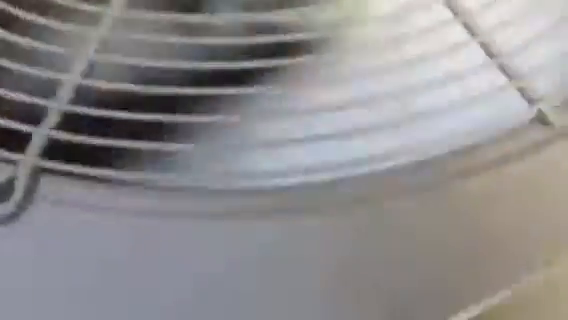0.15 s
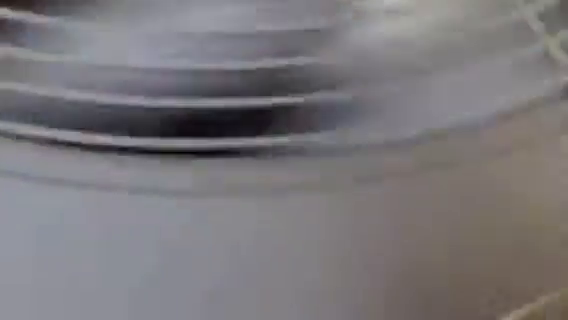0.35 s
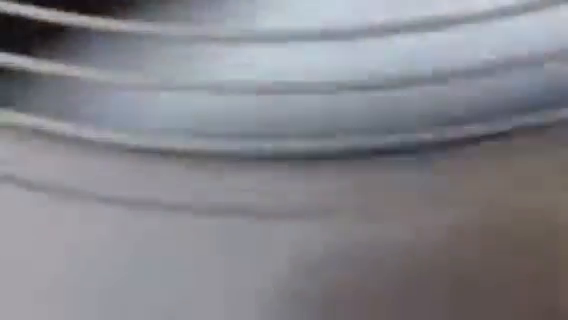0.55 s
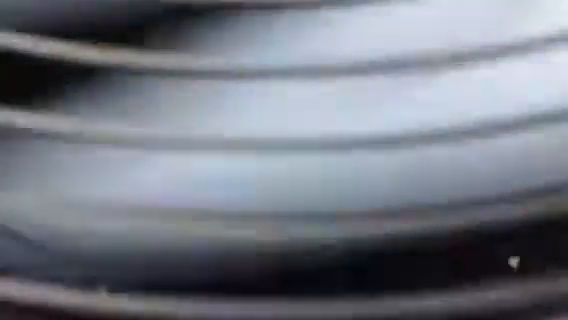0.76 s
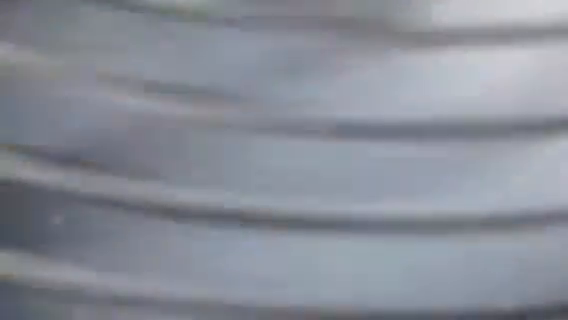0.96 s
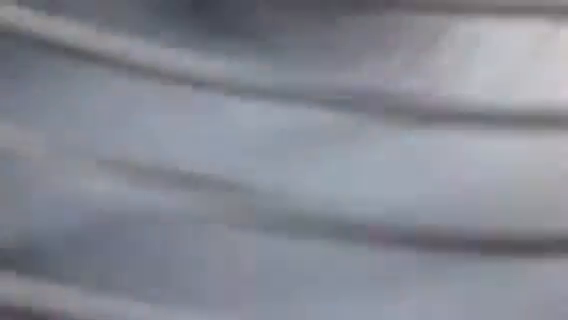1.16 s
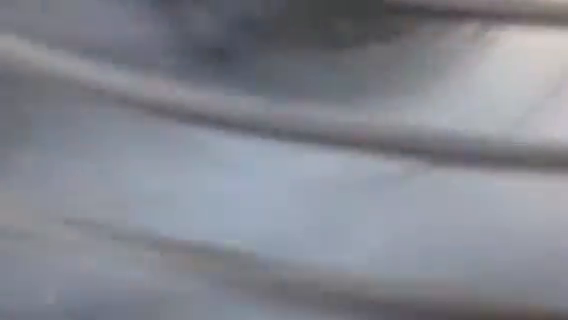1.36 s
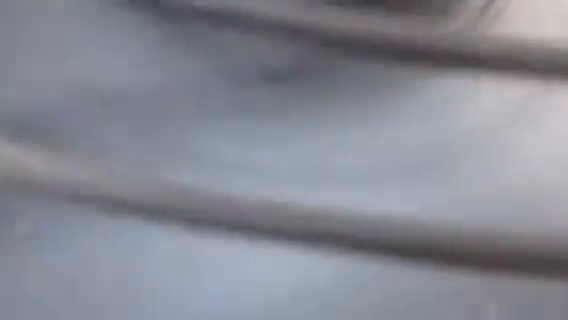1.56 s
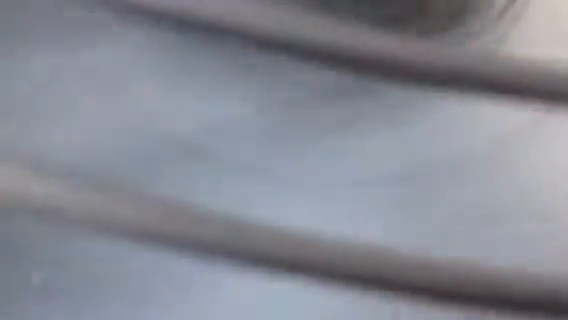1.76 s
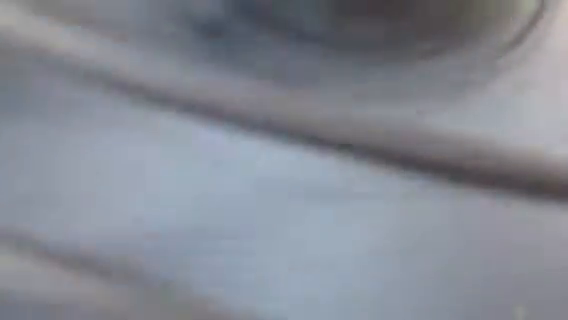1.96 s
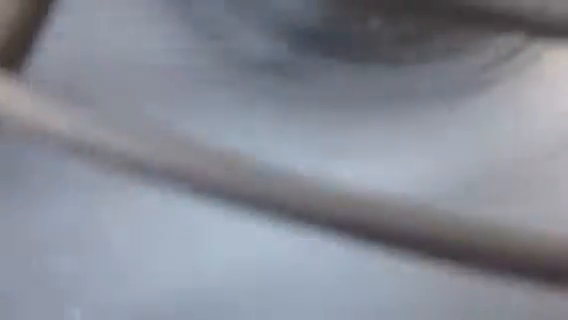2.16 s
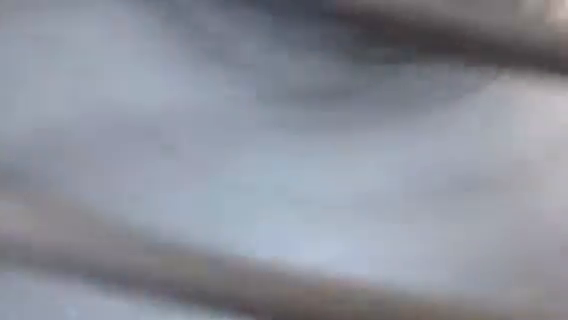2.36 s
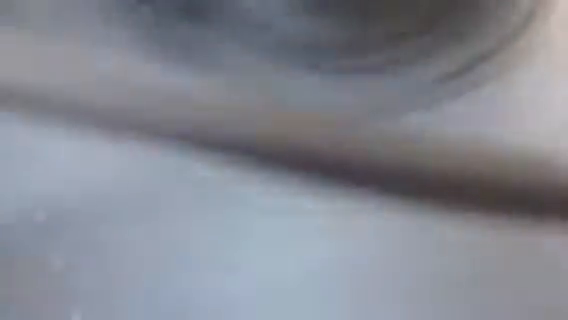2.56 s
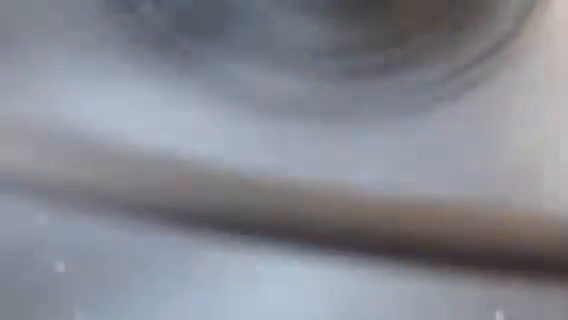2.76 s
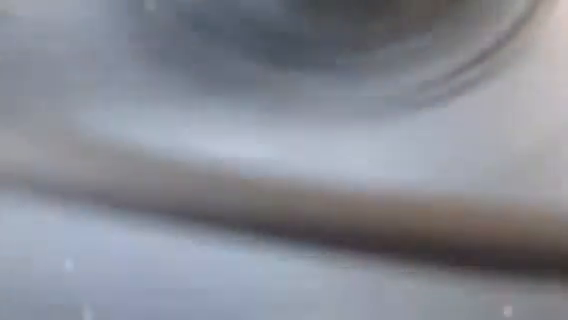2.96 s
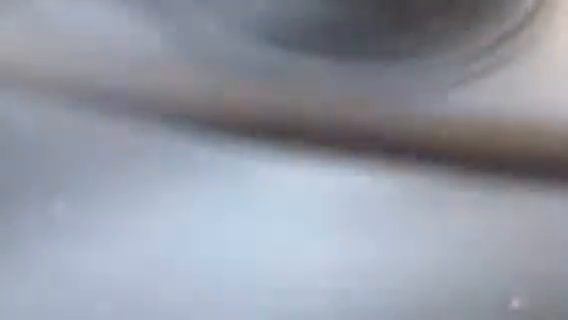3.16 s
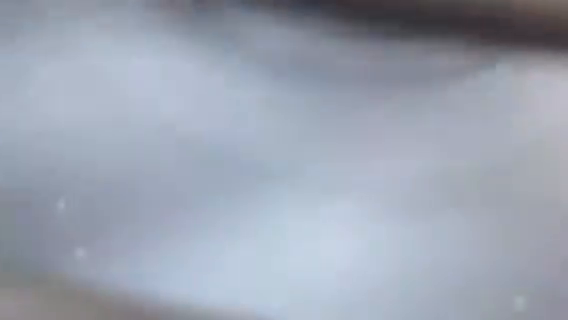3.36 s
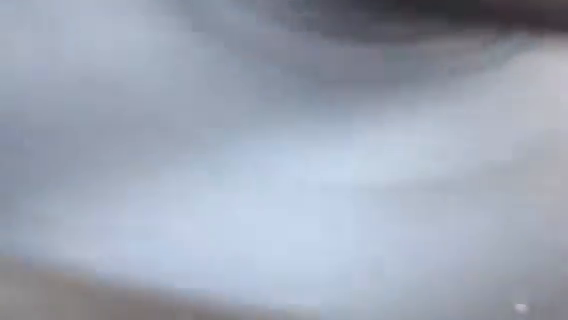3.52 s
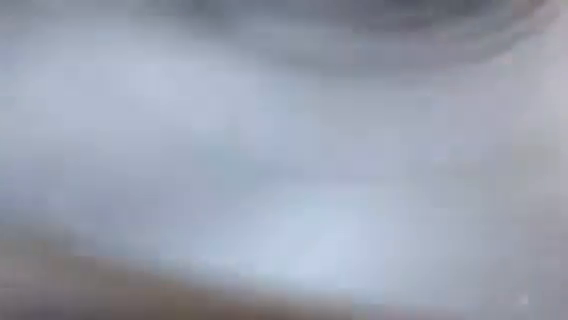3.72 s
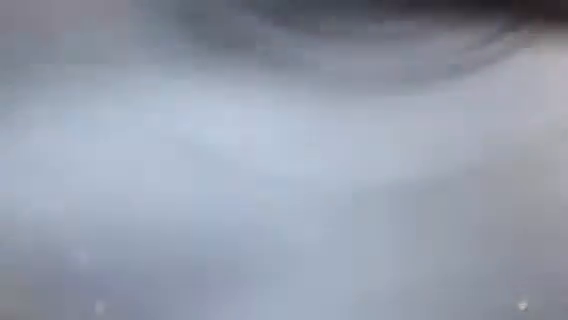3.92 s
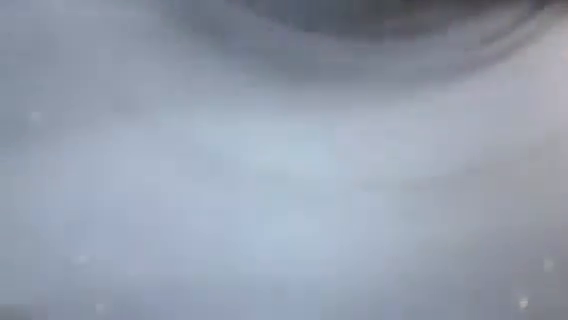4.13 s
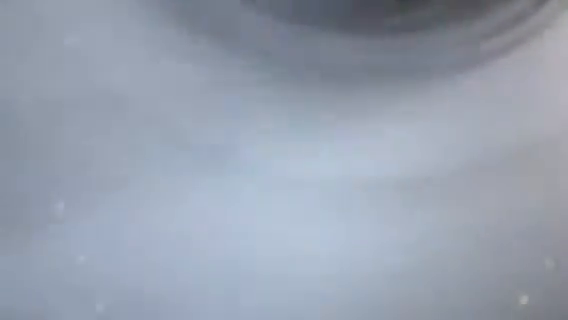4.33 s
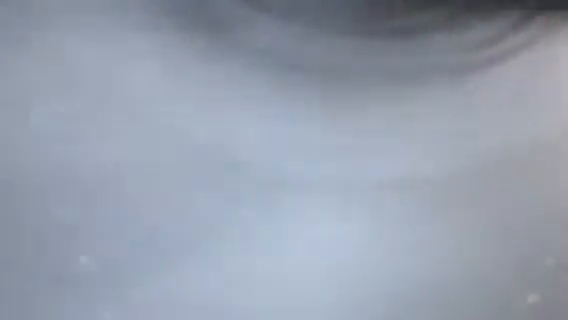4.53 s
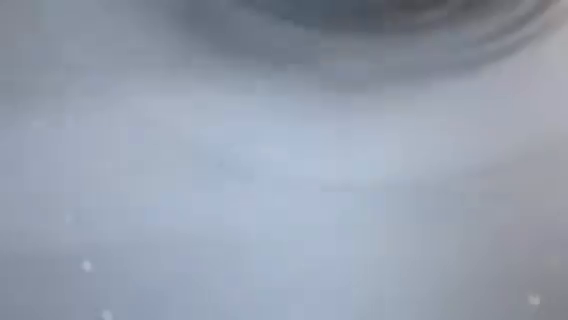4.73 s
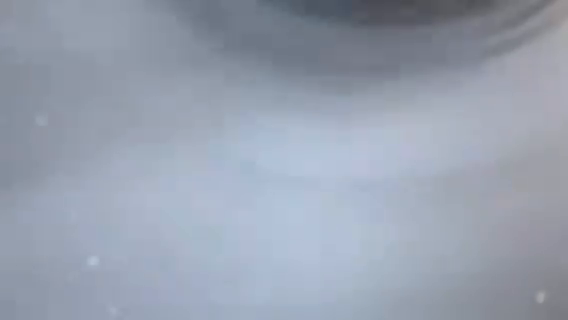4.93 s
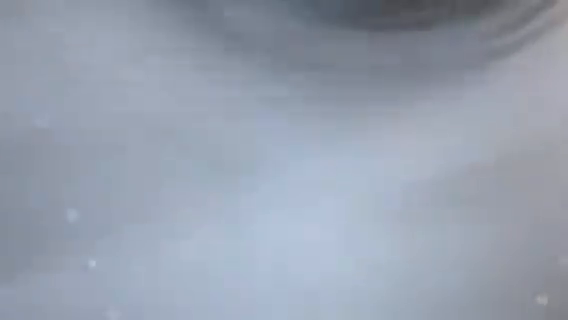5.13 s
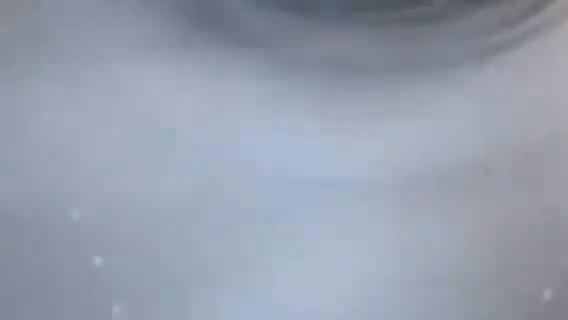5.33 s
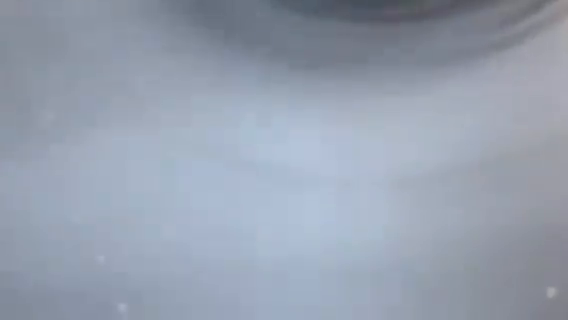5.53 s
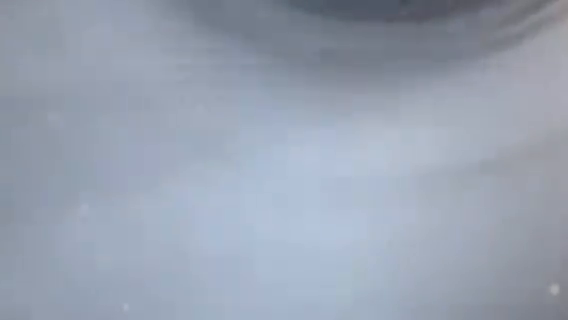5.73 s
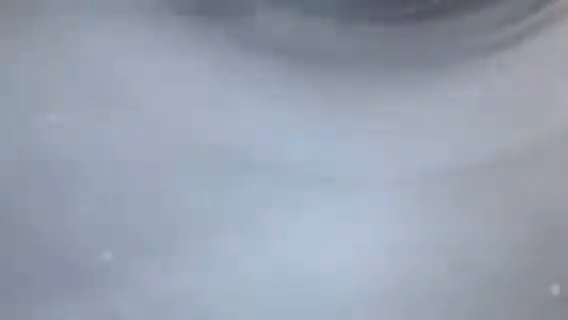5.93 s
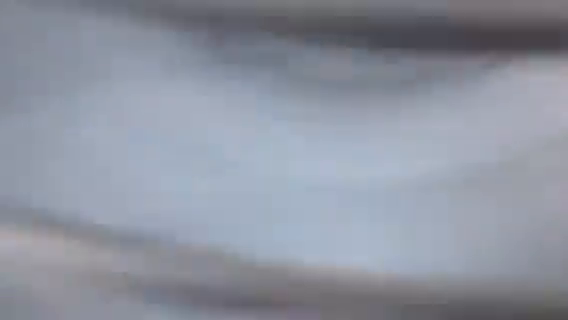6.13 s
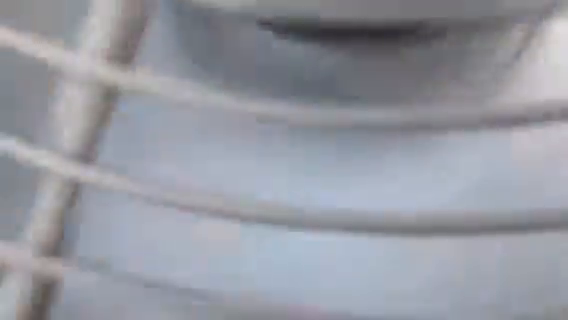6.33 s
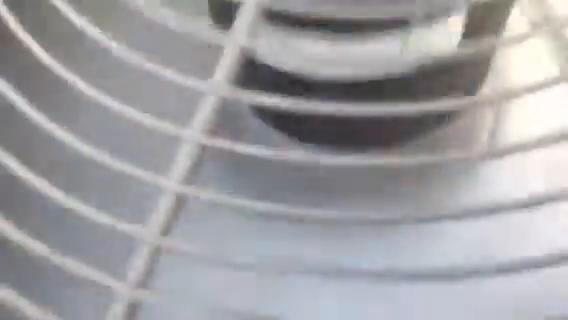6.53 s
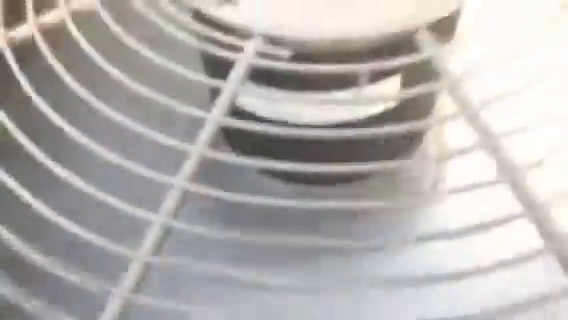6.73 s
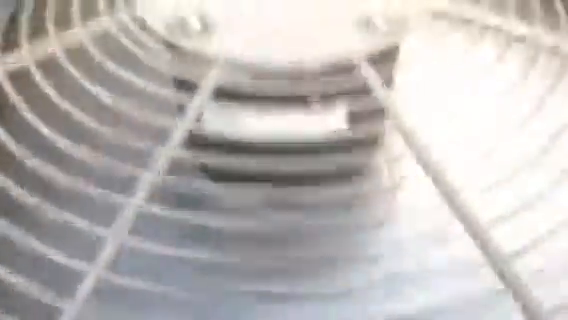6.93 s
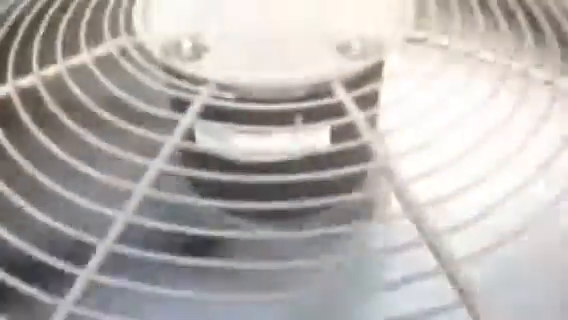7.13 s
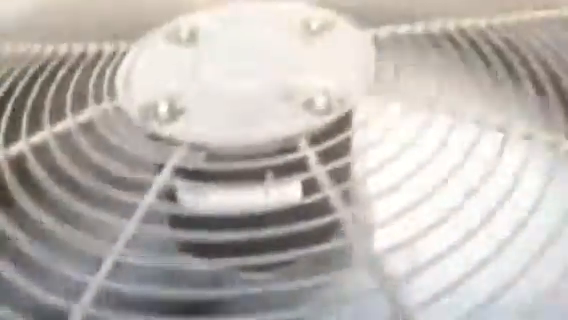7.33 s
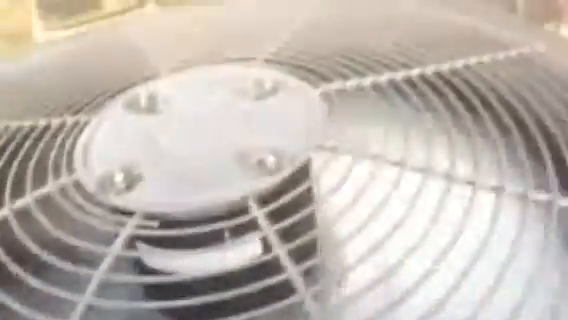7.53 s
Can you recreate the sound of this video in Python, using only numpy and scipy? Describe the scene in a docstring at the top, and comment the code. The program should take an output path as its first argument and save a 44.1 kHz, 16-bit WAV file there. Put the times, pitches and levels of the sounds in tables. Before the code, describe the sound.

Steady condenser hum and fan rush, suddenly overwhelmed by harsh wind rumble, thuds and snaps as the microphone moves over the fan, then calm again.

```python
"""An outdoor air conditioner condenser runs: the compressor buzzes as each shaft turn repeats, and the
fan's rush is coloured noise that swishes with the blades. A microphone moves in over the grille, where
blown air buffets it in lumps (swept eddy noise), puffs and spiky snaps, then draws back. The recorder's
gain control ducks at each deep shove of air and creeps back, so the steady hiss of the unit pumps."""
import sys
import numpy as np
from scipy import signal
from scipy.fft import rfft, irfft, next_fast_len
from scipy.io import wavfile
from scipy.ndimage import uniform_filter1d, minimum_filter1d, map_coordinates

SR = 44100
rng = np.random.default_rng(int(sys.argv[2]) if len(sys.argv) > 2 else 0)


def unload_audio(sound):
    """Save the sound as a 16-bit wav file, at the path given as the first command line argument."""
    columns = np.transpose(np.atleast_2d(sound))
    # keep every value between -1 and 1, then stretch to whole-number steps
    steps = np.round(np.clip(columns, -1, 1) * 32767)
    wavfile.write(sys.argv[1], SR, steps.astype(np.int16))


N = 334278
BLADE_HZ = 43.6  # mean blade passing rate

# air stream on the microphone: t/s, relative strength/dB, brightness/dB
STREAM = [(0.95, -13.5, -14.5), (1.05, -4, -15.5), (1.2, -10.5, -12), (1.28, -9, -10), (1.4, -9, -10.8),
          (1.56, -10, -14), (1.68, -9, -13), (1.85, -11, -12.5), (1.95, -11.5, -11), (2.08, -11, -11.5),
          (2.18, -11.5, -12), (2.35, -11, -14), (2.45, -11, -10), (2.55, -11, -11), (2.75, -10, -15),
          (2.82, -15, -10), (2.88, -10, -11.5), (2.97, -12.5, -10.5), (3.1, -11, -14), (3.25, -12.5, -17),
          (3.43, -12, -13.5), (3.55, -11, -13), (3.65, -13, -11), (3.75, -11, -11.5), (3.95, -12, -10.5),
          (4.05, -12, -13.5), (4.25, -13, -10.5), (4.35, -11.5, -15), (4.45, -14.5, -10.5),
          (4.52, -13, -11.5), (4.65, -13.5, -11.5), (4.75, -12, -11), (4.81, -16, -10.5),
          (4.88, -13.5, -11), (4.95, -13, -7.5), (5.17, -14, -10), (5.27, -17, -9.5), (5.44, -11, -11),
          (5.55, -13.5, -9), (5.66, -12, -8.5), (5.85, -11.5, -11), (6.0, -10.5, -12), (6.12, -9.5, -12.5),
          (6.25, -9, -9.5), (6.35, -9, -13.5), (6.45, -12, -12.5), (6.55, -12, -8), (6.65, -11, -7.5),
          (6.78, -10.5, -12.5), (6.95, -13.5, -16)]
# single eddies at the stream's edge and in its hardest jets: t/s, relative peak/dB, decay/s, pitch f/Hz
PUFFS = [(0.49, -5, 0.0062, 623), (.5, -10, 0.0055, 398), (.514, -10, .005, 417), (.717, -0.5, 0.0075, 450),
         (.788, -2, 0.0026, 620), (0.797, -0.5, 0.0067, 622), (0.833, -7, 0.009, 397),
         (.878, -7, .005, 447), (0.9, 3, 0.0055, 389), (.911, 3, .004, 521), (.921, 4, 0.0025, 597),
         (0.993, 2, 0.0023, 500), (1.053, 16.5, 0.0028, 369.4), (1.097, 11.5, 0.0038, 345),
         (1.125, 8, 0.0055, 451), (1.148, 9, 0.0026, 479), (1.172, 4, 0.0019, 903),
         (1.218, 0.5, 0.0058, 520), (1.265, -3, 0.013, 517.5), (1.36, 1, 0.0085, 560),
         (1.409, 3, 0.0064, 421), (1.486, 4.5, .0082, 400.4), (2.59, 2, 0.0021, 502),
         (2.667, -4, 0.0024, 563), (2.779, -4, 0.0045, 327.4), (2.919, -2, 0.0031, 654),
         (2.948, -1, 0.0024, 602), (2.969, -5, .0025, 652), (3.091, -1.5, .008, 417),
         (3.414, -3, 0.0074, 453.5), (3.63, 4.5, .004, 561), (3.661, -2.5, 0.0025, 601),
         (3.902, -2, 0.0032, 481), (3.997, -12, 0.0028, 562), (4.08, -4, 0.0071, 378.5),
         (4.374, -4, 0.0079, 338), (4.442, -4, 0.0066, 480), (4.57, -3.5, 0.0063, 478),
         (4.846, -0.5, 0.0058, 370), (4.911, -7, 0.0032, 580), (5.207, -3.5, 0.0045, 382),
         (5.533, -4, .004, 652), (6.081, -1, 0.005, 554), (6.127, 0, 0.0033, 654), (6.436, -3, 0.0052, 400),
         (6.462, -5, .003, 595), (6.515, -7, .003, 688), (6.534, 6.5, 0.007, 641.6),
         (6.546, 3, 0.0042, 854), (6.58, 2, 0.0024, 422), (6.595, 6, 0.0047, 946), (6.623, 3, 0.004, 947),
         (6.641, 8.5, 0.0039, 602), (6.665, 4.5, 0.0068, 680), (6.691, 1, 0.0031, 723),
         (6.709, 3, 0.0017, 1200), (6.731, 3.5, 0.0027, 350), (6.753, -0.5, 0.0047, 389),
         (6.775, -6, 0.0053, 388), (6.8, -2.5, 0.01, 521), (6.847, -1, 0.0045, 421),
         (6.894, -0.5, 0.0042, 481.5), (6.908, -3.5, 0.0053, 389.6), (6.957, -6, 0.012, 362),
         (6.994, -7.5, 0.0045, 375), (7.039, -11.5, 0.0077, 607), (7.058, -2.5, 0.0077, 448),
         (7.079, -11.5, 0.0051, 422), (7.153, -13.5, 0.0052, 402), (7.204, -11.5, .003, 259),
         (7.213, -8.5, 0.004, 330.7), (7.524, -10.5, 0.0074, 429.5)]
# hardest eddies snapping on the port: t/s, relative peak/dB, pitch f/Hz
SNAPS = [(0.4918, -1.5, 1050), (0.7213, -4.5, 1050), (0.7871, -3.5, 1000), (0.7967, -3, 1120),
         (0.9198, 0.5, 1140), (1.2566, -3.5, 1080), (1.2738, 1, 1100), (1.29, -7, 1000), (1.32, -8, 1200),
         (1.333, -8, 1040), (1.345, -11, 1200), (1.361, -9, 1060), (1.379, -8, 1040), (1.3937, -2, 950),
         (1.4584, 3, 1150), (1.9095, -7, 1270), (1.9672, -4.5, 1020), (2.014, -14, 794),
         (2.066, -6.5, 1050), (2.3426, -4, 1450), (2.452, -4, 1040), (2.475, -13, 950), (2.519, -7.5, 1480),
         (2.5518, -12, 1000), (2.667, -16, 1000), (2.869, -6.5, 1080), (2.9192, -10, 1000),
         (2.948, -13, 990), (2.969, -15, 1050), (3.2849, -4, 1000), (3.436, -6, 1180), (3.5603, -4.5, 1000),
         (3.571, -12, 1270), (3.5822, -8, 1050), (3.661, -12, 1000), (3.7284, -5, 1140), (3.7475, -6, 1460),
         (3.7835, -9, 1000), (3.8116, -7, 1350), (4.1922, -6, 990), (4.201, -6.5, 900), (4.414, -5, 900),
         (4.746, -7, 990), (4.909, -13.5, 1040), (4.9276, -5.5, 1290), (4.9568, -1, 1100),
         (5.0163, -6, 1100), (5.0503, -7, 1250), (5.076, -8, 1050), (5.1528, -3.5, 1000),
         (5.457, -10, 1250), (5.531, -9, 1100), (5.5427, -5, 1020), (5.5796, -7, 1210),
         (5.6945, -5.5, 1520), (5.8665, -6.5, 1360), (6.007, -8, 900), (6.027, -11, 1080),
         (6.0807, -8, 1000), (6.1268, -2, 1030), (6.158, -7, 1040), (6.2063, -5, 1290), (6.2693, -7, 1180),
         (6.2835, -5, 1180), (6.322, -5, 1010), (6.461, -23, 1126), (6.4889, -2, 1350), (6.503, -10, 1350),
         (6.491, -8.5, 1400), (6.515, -4, 1100), (6.524, -11, 1550), (6.536, -7, 1500), (6.5456, -2, 1600),
         (6.567, -9, 1500), (6.582, -7, 1570), (6.5944, 4, 1900), (6.601, -3, 1600), (6.6221, 6.5, 1670),
         (6.64, 0.0, 1400), (6.6466, -3, 1500), (6.6684, -1, 1750), (6.677, -1, 1200), (6.6892, -4, 1440),
         (6.693, -3, 1400), (6.7088, 6, 1750), (6.894, -1.5, 800)]
# eddy spectrum at unit speed: f/Hz, relative level/dB
EDDY = [(30, -15), (100, 2), (200, 1), (400, -3.5), (800, -12.5), (1400, -22.5), (2200, -35), (4000, -45),
        (8000, -57.5)]


def amp(db):
    """Decibels to gain."""
    return 10 ** (np.asarray(db) / 20)


def unit(x):
    """Scale to rms 1."""
    return x / np.sqrt(np.mean(x ** 2) + 1e-20)


def along(points, hz):
    """(f/Hz, value) points read on a log frequency axis."""
    f, v = np.transpose(points)
    return np.interp(np.log(hz + 1), np.log(f + 1), v)


def curves(rows):
    """One value per sample for each column after the time."""
    s, *cols = np.transpose(rows)
    return [np.interp(np.arange(N) / SR, s, c) for c in cols]


def wobble(rate):
    """Smooth random curve, rate knots per second."""
    knots = rng.standard_normal(8192)
    return map_coordinates(knots, [np.arange(N) * rate / SR], mode="wrap")


def tone(turns):
    """Sine of rms 1 from its phase in turns."""
    return np.sqrt(2) * np.sin(2 * np.pi * turns)


def filtered(x, response):
    """x times a response of frequency, zero phase."""
    m = next_fast_len(N + SR // 2)
    return irfft(rfft(x, m) * response(np.fft.rfftfreq(m, 1 / SR)), m)[:N]


def noise(spectrum):
    """Noise of rms 1 with the given colour."""
    return unit(filtered(rng.standard_normal(N), lambda hz: amp(along(spectrum, hz))))


def local_rms(x, seconds):
    """Running rms."""
    return np.sqrt(np.abs(uniform_filter1d(x ** 2, max(int(seconds * SR), 2))) + 1e-12)


def low_cut(x, edge_hz, order):
    """Causal high-pass."""
    return signal.sosfilt(signal.butter(order, edge_hz, "highpass", fs=SR, output="sos"), x)


def limiter(x, ceiling, hold_s):
    """The gain ducks just ahead of each peak and soon returns."""
    size = max(int(hold_s * SR), 2)
    needed = np.minimum(1, ceiling / (np.abs(x) + 1e-9))
    return x * uniform_filter1d(minimum_filter1d(needed, size), size)


def hiss(spectrum):
    """Coloured noise whose part above 7.5 kHz has rms 1."""
    x = noise(spectrum)
    return x / np.std(low_cut(x, 7500, order=8))


def in_stream():
    """How fully the microphone sits in the blown air, 0-1."""
    # entering and leaving the blown air: t/s, share/1
    immersion = [(.45, 0.05), (.7, 0.13), (.86, 0.37), (.97, 0.72), (1.3, 0.84), (6.7, 0.77), (6.82, 0.57),
                 (7.06, 0.13), (7.1, 0)]
    return np.clip(curves(immersion)[0], 0, 1)


def casing_hiss(over, whistle_hz, whistle_db):
    """Broadband hiss of the casing plus a thin whistling noise band; both fade over the grille."""
    # f/Hz, relative level/dB
    casing = [(35, -74), (60, -44), (110, -14), (231, -0.5), (931, -6), (1020, -6), (1230, -8),
              (1480, -5.5), (2050, -7.5), (2980, -12), (12000, -21), (15500, -24.5)]
    whistle = unit(filtered(rng.standard_normal(N), lambda hz: 1 / (1 + ((hz - whistle_hz) / 200) ** 2)))
    return np.sqrt(1 - over) * amp(1.26) * hiss(casing) + (1 - over) ** 3 * amp(whistle_db) * whistle


def cabinet(x):
    """Sheet-metal resonances lift a few narrow bands of the hiss."""
    # f/Hz, width/Hz, lift/dB
    resonances = [(4500, 280, 2.5), (6000, 300, 2), (7260, 280, 1.5), (10800, 350, 2), (13300, 250, 3)]

    def response(hz):
        return amp(sum(db * np.exp(-((hz - centre) / width) ** 2) for centre, width, db in resonances))

    return filtered(x, response)


def fan_rush(over, blade_turns, swish_db):
    """Air rushes through the grille: noise swishing with the blades and flickering at random."""
    # f/Hz, relative level/dB
    grille = [(35, -60), (60, -28), (115, -2), (150, 11.5), (215, 9), (423, 0.5), (1150, -12), (1670, -7),
              (2010, -4), (2710, -9.5), (5840, -11), (13200, -23), (15500, -23.5)]
    swish = amp(swish_db * np.sin(2 * np.pi * blade_turns) + 1.35 * wobble(70))
    return amp(-1) * np.sqrt(over) * cabinet(hiss(grille)) * swish


def compressor(wander_hz, scatter_db):
    """Each shaft turn repeats one buzz; the casing favours some overtones; the shaft speed wanders."""
    # weak overtones: f/Hz, relative level of each/dB
    weak = [(59, -83), (170, -53), (700, -51.5), (2200, -58), (3300, -75), (4500, -58.5), (7000, -65),
            (10000, -86), (12000, -78), (15000, -81)]
    # strong tones: multiple of shaft speed/1, relative level/dB
    strong = [(3, -47), (6, -43), (9, -48), (10, -56), (12, -55), (17, -40), (18, -43), (19, -47),
              (24, -50), (25, -46), (26, -44), (27, -45), (28, -46), (32, -50), (34, -41), (35, -44),
              (36, -48), (38, -50), (41, -46), (44, -51), (47, -53), (54, -56), (70, -54), (71, -56),
              (73, -58), (75, -55), (79, -58), (96, -59), (120, -59), (202, -61), (205, -61), (226, -65)]
    shaft_hz, size = 58.76, 8192  # mean shaft speed, samples per stored turn
    orders = np.arange(1, 261)
    level = np.zeros(size // 2 + 1)
    scatter = scatter_db * rng.standard_normal(len(orders))
    level[orders] = amp(along(weak, orders * shaft_hz) + scatter)
    for order, db in strong:
        level[order] = amp(db)
    phases = np.exp(2j * np.pi * rng.random(len(level)))
    turn = irfft(level * phases) * size / np.sqrt(2)
    angle = np.cumsum(shaft_hz + wander_hz * wobble(5)) / SR
    return np.interp(angle % 1 * size, np.arange(size), turn)


def shielded_buzz(over):
    """Moving air makes the compressor's tones waver; over the grille they come through coloured."""
    # transmission through the grille: f/Hz, gain/dB
    shield = [(200, 2), (1000, -46), (1600, -5), (2000, -6.5), (4000, 0), (12000, -15)]
    buzz = compressor(wander_hz=0.0371, scatter_db=3.0) * amp(2.25 * wobble(30))
    return (1 - over) * buzz + over * filtered(buzz, lambda hz: amp(along(shield, hz)))


def magnetic_hum():
    """The motors hum at twice and four times the mains frequency, each tone wavering in level."""
    # f/Hz, relative level/dB
    mains = [(120, -43), (240, -45)]
    return sum(amp(db + 5.7 * wobble(14)) * tone(hz * np.arange(N) / SR) for hz, db in mains)


def fan_tones(blade_turns, waver_db, count):
    """The blades pass the struts: a row of low harmonics, each wavering by itself."""
    # level curve of the harmonics: f/Hz, relative level of each/dB
    strut_tones = [(130, -54), (220, -48), (440, -53), (750, -52.5)]
    out = np.zeros(N)
    for k in np.arange(count) + 3:
        level = amp(along(strut_tones, k * BLADE_HZ) + waver_db * wobble(16))
        out += level * tone(k * blade_turns + rng.random())
    return out


def blade_throb(blade_turns):
    """Passing blades throb at the lowest blade harmonics, more strongly in the stream."""
    # multiple of blade rate/1, relative level/dB
    harmonics = [(1, -62), (2, -46), (3, -48)]
    throb = sum(amp(db) * tone(k * blade_turns) for k, db in harmonics)
    return throb * (0.087 + 2.04 * in_stream())


def machine(blade_turns, swish_db, whistle_hz, whistle_db):
    """Beside the casing the compressor leads; over the grille the fan's rush covers it."""
    # microphone place: t/s, share/1 (0 beside the casing, 1 over the grille)
    place = [(0, 0.039), (.45, 0.044), (.56, .22), (.9, 0.3), (1.3, 0.77), (3.5, 0.42), (6, 0.58),
             (7.1, 0.74), (7.58, 0.64)]
    # gain on the unit's steady sound: t/s, gain/dB
    steady = [(.45, -40.5), (.6, -40.5), (1.3, -44), (5.2, -46.5), (5.55, -44.5), (6.0, -42), (6.3, -44.5),
              (6.8, -45), (7.1, -42.5), (7.58, -41.5)]
    over = np.clip(curves(place)[0], 0, 1)
    casing = casing_hiss(over, whistle_hz, whistle_db)
    fan = fan_rush(over, blade_turns, swish_db)
    motors = amp(40.5) * shielded_buzz(over)
    motors += amp(40.0 + 2.0 * over) * magnetic_hum()
    motors += amp(39.0 + 2.0 * over) * fan_tones(blade_turns, waver_db=2.5, count=15)
    return amp(curves(steady)[0]) * (casing + fan + motors) + blade_throb(blade_turns)


def swept(eddies, speed):
    """Eddies carried past the port: the faster the air, the higher they sound."""
    return map_coordinates(eddies, [np.cumsum(speed)], order=1, mode="wrap")


def buffeting(blades, level_db, crest_db, churn_db, chop_db, flick_db, quicken, brighten, port_hz):
    """Turbulent air on the port: every surge is louder and brighter, and each blade adds a push."""
    strength_db, bright_db = curves(STREAM)
    surge_db = churn_db * unit(wobble(330) + .55 * wobble(90)) + chop_db * blades
    flick = flick_db * wobble(900)  # the smallest swirls steepen single swings of pressure
    brightening = brighten * (bright_db - bright_db.mean())
    speed = amp(quicken * surge_db + flick + brightening - 2.5)
    air = low_cut(amp(surge_db) * swept(noise(EDDY), speed), port_hz, order=4)
    # ordinary lumps stay below the hard puffs
    air = limiter(air / local_rms(air, 0.076), amp(crest_db), hold_s=0.0028)
    return amp(strength_db + level_db) * in_stream() * air


def lulls(depth_db, lead_s, width_s):
    """The stream slackens for a moment before each hard eddy: a gain curve."""
    dip, t = np.zeros(N + SR), np.arange(-SR // 16, SR // 16) / SR
    for s, *_ in [*SNAPS, *PUFFS]:
        dip[round((s + t[0]) * SR):][:len(t)] += np.exp(-((t + lead_s) / width_s) ** 2)
    return amp(-depth_db * np.minimum(dip[:N], 1))


def snap_swings(gain_db, count):
    """Each hard snap: a lead-in swing, a sharp one, weaker slower ones; rows of (t/s, peak, f/Hz)."""
    gap_s, loss_db, slowing = 0.0014, 5, 0.7  # mean gap; level loss and pitch ratio per swing
    chance = rng.random((len(SNAPS), count))
    rows = []
    for (s, db, hz), draws in zip(SNAPS, chance):
        for k, u in enumerate(draws, -1):
            at_s = s + gap_s * (k + 0.66 * (u - .5))
            peak = amp(db + gain_db - loss_db * abs(k))
            rows.append((at_s, peak, hz * (0.88 + 0.59 * u) * slowing ** abs(k)))
    return rows


def crackle(blades, rate_hz, pitch_hz, size_db, spread_db, snap_db, steepness):
    """Eddies burst on the port as spiky swings of pressure, the tiny ones mostly in a blade's wake."""
    strength_db, bright_db = curves(STREAM)
    size = amp(strength_db + bright_db + size_db) * in_stream()
    when, weight, chance, pitch = rng.random((4000, 4))[:int(rate_hz * N / SR)].T
    at = (when * (N - 1)).astype(int)
    heard = chance < .6 + .4 * blades[at]
    peak = size[at] * amp(-spread_db * np.log(weight + 0.025)) * heard
    small = np.column_stack([at / SR, peak, pitch_hz * 2 ** (0.45 * (pitch - .5))])
    hard = snap_swings(snap_db, count=5)
    s, peak, hz = np.vstack([small, hard]).T[:, :, None]
    index = np.round(s * SR).astype(int) + np.arange(-200, 200)
    u = steepness * hz * (index / SR - s)
    swing = rng.choice([-1, 1], s.shape) * peak * (1 - 3 * u ** 2) / (1 + u ** 2) ** 3
    return np.bincount(np.clip(index, 0, N - 1).ravel(), swing.ravel(), N)


def thumps(gain_db, lumpy_db, floor_db):
    """The slowest swirls reach the microphone as a faint lumpy rumble."""
    spectrum = [(10, 11), (25, 21), (40, -2), (70, 6.5), (150, -24), (400, -100)]  # f/Hz, relative level/dB
    rumble = noise(spectrum) * amp(lumpy_db * wobble(22))
    return (amp(gain_db) * in_stream() + amp(floor_db)) * unit(rumble)


def ticks(edge_hz):
    """Dry, bright ticks: decaying bursts of band-passed noise."""
    # t/s, peak ahead of the recorder/dB, t60/s, top f/Hz
    cracks = [(.3998, -8.5, 0.0032, 13000), (1.056, -2, 0.0078, 5000), (1.125, -11, 0.0087, 4500),
              (1.171, -6, 0.009, 4200), (1.404, -18, .012, 4940)]
    out, t = np.zeros(N), np.arange(SR // 50) / SR
    for s, db, t60, top_hz in cracks:
        band = signal.butter(2, [edge_hz, min(top_hz, .45 * SR)], "bandpass", fs=SR, output="sos")
        crack = signal.sosfilt(band, rng.standard_normal(len(t)) * amp(-60 * t / t60))
        out[round(s * SR):][:len(t)] += amp(db) * crack / np.abs(crack).max()
    return out


def puffs(eddy_hz, port_hz, gain_db, attack_share, tail_speed):
    """Single eddies hit the port: a quick bright rise and a ragged tail that slows and dulls."""
    out, eddies = np.zeros(N + SR), noise(EDDY)
    t = np.arange(-SR // 16, SR // 16) / SR
    for s, db, decay_s, pitch_hz in PUFFS:
        shape = np.exp(-np.maximum(t, -t / attack_share) / decay_s)
        speed = pitch_hz / eddy_hz * (tail_speed + (1 - tail_speed) * shape)
        air = swept(np.roll(eddies, rng.integers(N)), speed)
        puff = low_cut(shape * air, port_hz, order=4)
        out[round((s + t[0]) * SR):][:len(t)] += amp(db + gain_db) * puff / np.abs(puff).max()
    return out[:N]


def shoves():
    """Slow shoves of air, too deep to hear, that duck the recorder: smooth swells of pressure."""
    # t/s, peak ahead of the recorder/dB
    swells = [(.496, 9), (.721, 11), (.925, 13.5), (1.06, 21.5), (1.414, 14), (1.49, 13.5), (2.121, 11),
              (2.593, 11), (2.782, 10.5), (3.631, 5.5), (3.732, 9), (4.573, 6.5), (4.848, 8.5), (5.583, 10),
              (6.18, 8), (6.293, 9.5), (6.543, 7.5), (6.599, 14), (6.645, 9.5), (6.713, 13)]
    half_s = .017  # standard deviation of the swell
    out, t = np.zeros(N + SR), np.arange(-SR // 10, SR // 10) / SR
    for s, db in swells:
        out[round((s + t[0]) * SR):][:len(t)] += amp(db) * np.exp(-.5 * (t / half_s) ** 2)
    return out[:N]


def scene():
    """The unit and the air that it blows on the microphone."""
    blade_turns = np.cumsum(BLADE_HZ + 0.2217 * wobble(4.01)) / SR
    blades = np.sin(2 * np.pi * blade_turns)
    condenser = machine(blade_turns, swish_db=.5, whistle_hz=12000, whistle_db=-9)
    roar = buffeting(blades, level_db=2.5, crest_db=12.0, churn_db=2.0, chop_db=0.6, flick_db=2.0,
                     quicken=.5, brighten=.45, port_hz=165.4)
    roar = roar * lulls(depth_db=2.0, lead_s=0.0093, width_s=0.0038)
    snaps = crackle(blades, rate_hz=340, pitch_hz=1000, size_db=6.0, spread_db=4.0, snap_db=2.0,
                    steepness=2.3)
    rumble = thumps(gain_db=-45, lumpy_db=11, floor_db=-48)
    gusts = puffs(eddy_hz=438.4, port_hz=133, gain_db=1.0, attack_share=0.404, tail_speed=.65)
    return (condenser + roar + snaps + rumble + ticks(edge_hz=1500) + gusts + shoves())[None]


def gain_control(x):
    """The gain drops at once for any peak above the target, then creeps back towards full."""
    target_db, return_s = 6.5, 0.58  # allowed peak, time constant of the return
    cut = 1 - np.minimum(1, amp(target_db) / (np.abs(x) + 1e-9))
    fade = np.exp(-np.arange(N) / SR / return_s)
    gain = 1 - np.maximum.accumulate(cut / fade) * fade
    return uniform_filter1d(minimum_filter1d(gain, size=64), size=64)


def record(dry):
    """Gain set by the full pressure, deep bass cut, peaks limited, highest treble removed."""
    top_hz = 15400
    ridden = gain_control(dry[0]) * low_cut(dry[0], 48, order=5)
    held = limiter(ridden, ceiling=.7, hold_s=.002)
    return filtered(held, lambda hz: hz < top_hz)[None]


dry = scene()
out = record(dry)
unload_audio(out)
```